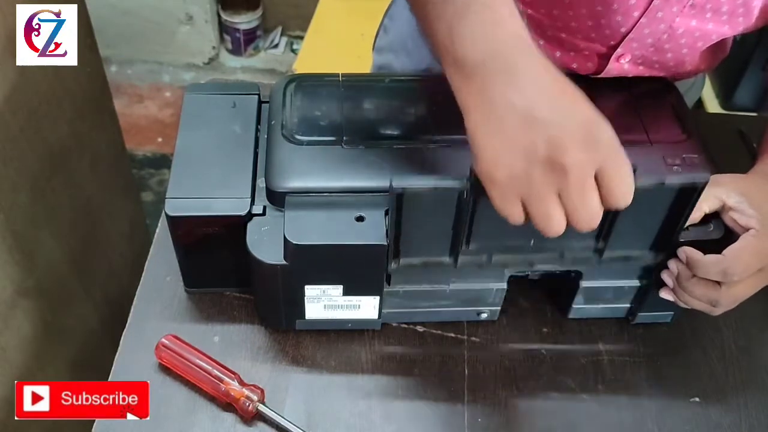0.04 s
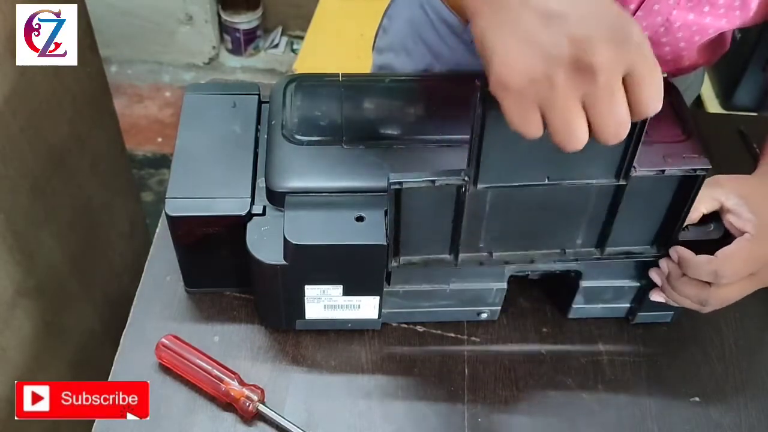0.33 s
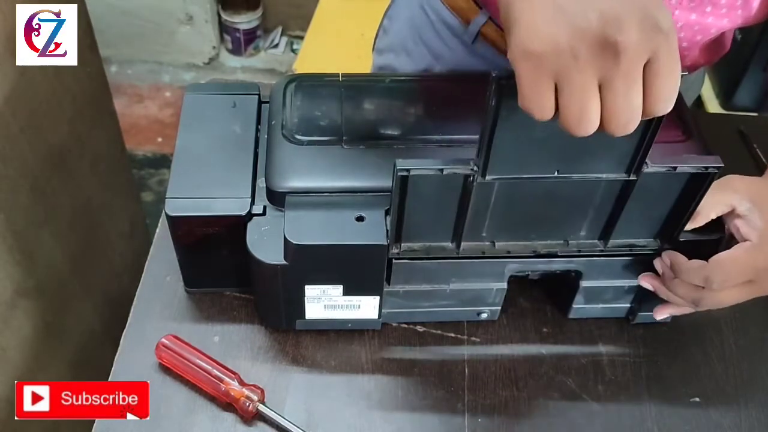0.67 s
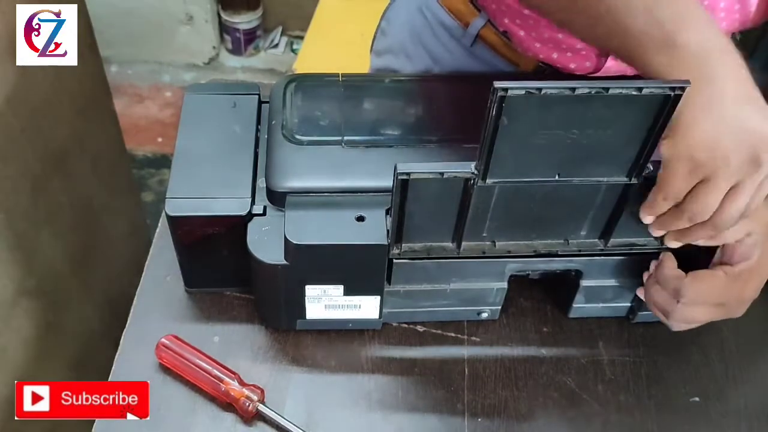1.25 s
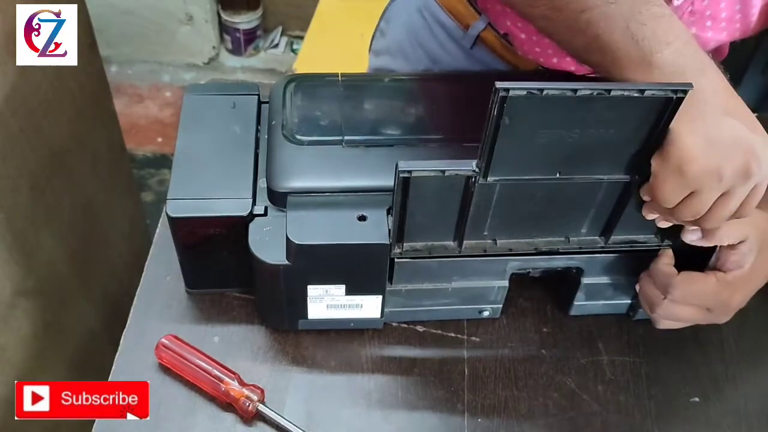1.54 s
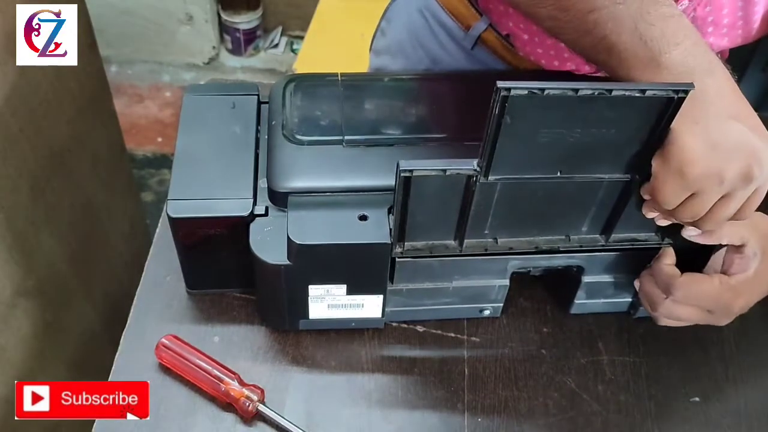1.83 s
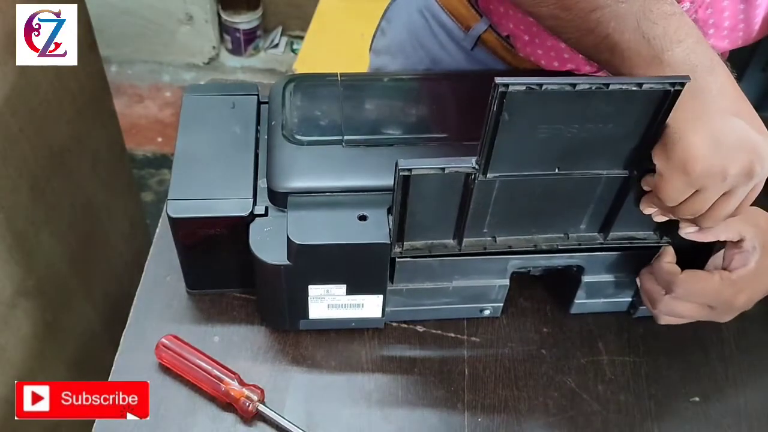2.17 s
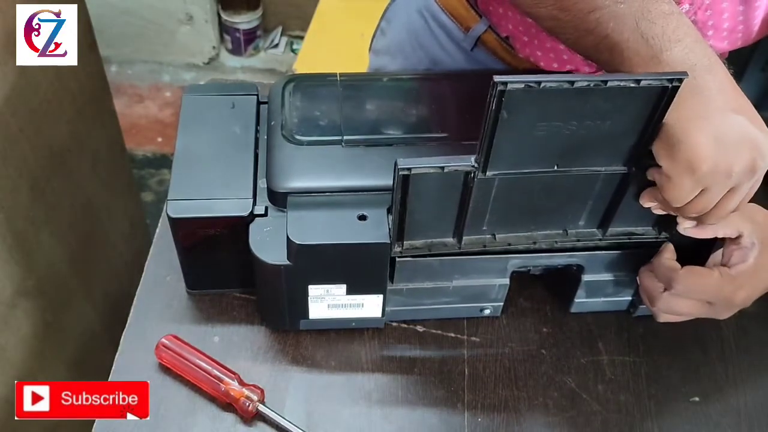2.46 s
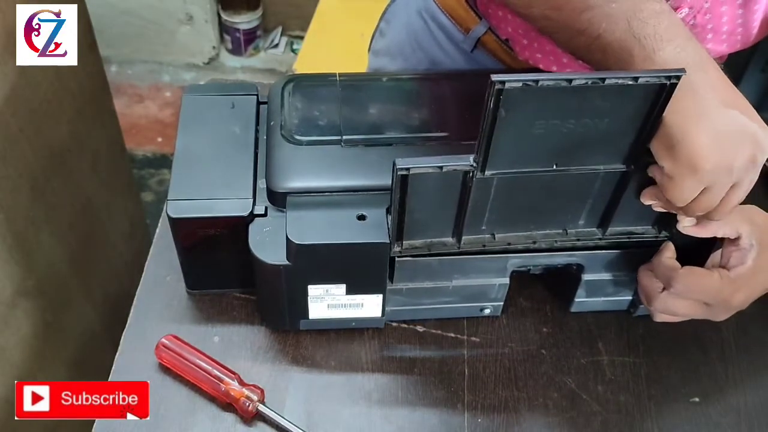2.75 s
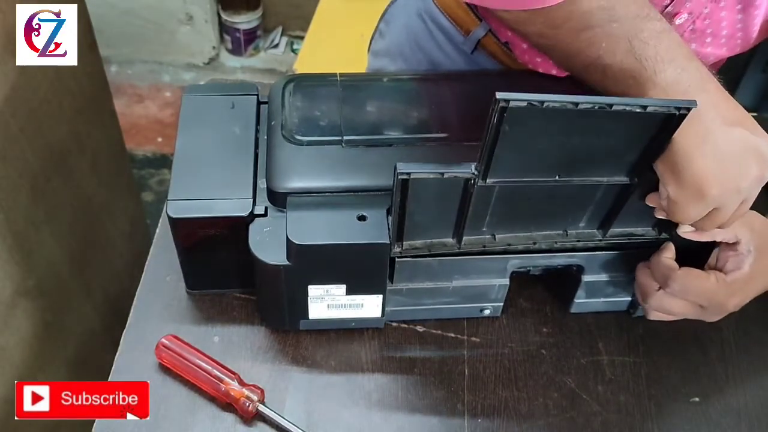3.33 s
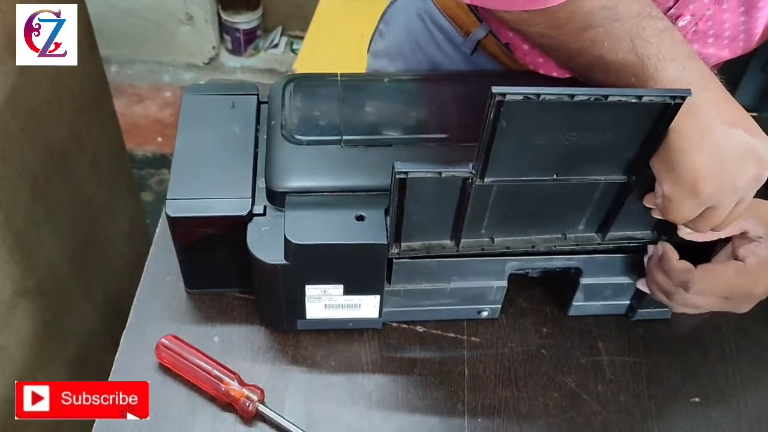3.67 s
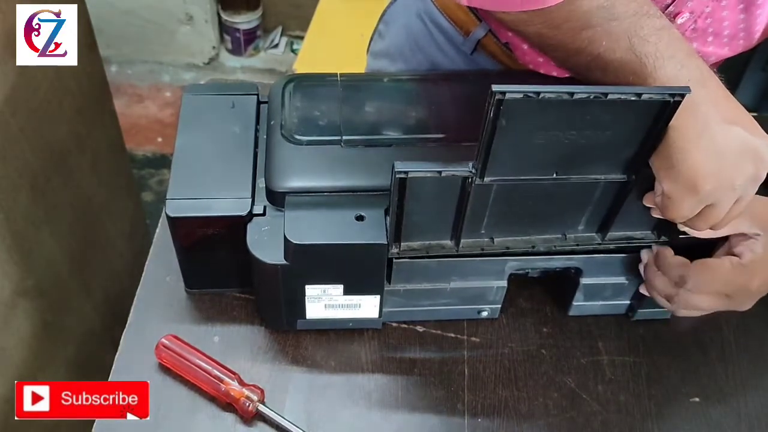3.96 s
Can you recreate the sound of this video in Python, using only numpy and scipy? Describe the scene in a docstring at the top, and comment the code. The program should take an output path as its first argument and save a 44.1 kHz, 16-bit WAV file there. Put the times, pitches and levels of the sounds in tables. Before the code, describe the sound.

A printer's plastic paper tray slides out with three hollow clacks. Fingers then scuff, knock and snap at the casing, rubbing harder near the end with a faint squeak. Heard close in a small room with a faint hum.

```python
"""A printer's plastic paper tray slides out in a small room, over soft air noise and a faint hum.
It clacks against its stops three times, ringing the hollow shell; faint bass bursts underlie the clacks,
and the last leaves a thin metal ring. Fingers then scuff, knock and snap a corner of the casing.
Rubbing, heard throughout, grows near the end, where strained plastic squeaks. A close phone picks it up."""
import sys
import numpy as np
from scipy import signal
from scipy.fft import rfft, irfft
from scipy.io import wavfile
from scipy.ndimage import map_coordinates

SR = 44100
rng = np.random.default_rng(int(sys.argv[2]) if len(sys.argv) > 2 else 0)


def to_wav(s):
    """Save 16-bit WAV."""
    ch = np.atleast_2d(s).T  # columns
    pcm = np.round(np.clip(ch, -1, 1) * 32767)  # PCM
    wavfile.write(sys.argv[1], SR, pcm.astype(np.int16))


N = 176400

# contact registers: body, low mids, high mids, treble
# (from [Hz], to [Hz], attack [s], base t60 [s], base room tail [dB], L/R likeness [0-1], L-R [dB])
REGISTERS = [(291, 558, 0.0088, 0.11, -20.5, 0.86, 0.5), (600, 1140, 0.00022, 0.11, -2.5, 0.79, 0),
             (1162, 3370, 0.00081, 0.095, -2.5, 0.52, -1.5), (3430, 23500, 0.000097, 0.061, 2, 0.11, -1.5)]
# broad response of the plastic (frequency [Hz], gain [dB])
PLASTIC_COLOUR = [(250, 0), (320, 1), (600, 2.5), (1250, -6), (2200, -8.5), (2650, -13), (3300, -16),
                  (5400, -24), (6150, -21), (6500, -12), (7100, -12), (7800, -18), (10000, -25),
                  (13500, -27.5), (15000, -22.5)]
# room air spectrum (frequency [Hz], gain [dB])
AIR_COLOUR = [(250, -2.5), (350, 4.5), (550, 9.5), (900, -3.5), (1500, -15), (3000, -16.5), (5200, -25),
              (6100, -20.5), (6900, -29.5), (8200, -19.5), (13000, -53), (15200, -24.5)]
# tray sliding in its guides (time [s], level [dB])
SLIDE_LEVELS = [(0, -40.5), (.04, -45), (.09, -55.5), (.15, -45.5), (.17, -41.5), (.24, -48.5), (.28, -53),
                (.38, -49.5), (.425, -78), (.46, -45.5), (.52, -53), (.6, -84)]
# slide spectrum (frequency [Hz], gain [dB])
SLIDE_COLOUR = [(250, 2.5), (600, -2.5), (1200, -4.5), (2500, 1), (7000, 3.5), (15000, 5)]
# tray resonances (frequency [Hz], t60 [s], gain [dB])
TRAY_MODES = [(358, 0.19, -1), (511, 0.13, 2.5), (589, 0.057, 1), (668, 0.052, -6), (791, .25, 3.5),
              (1156, 0.1, -5), (1225, 0.045, 4.5), (1550, 0.077, -4), (3000, 0.067, 3), (6700, 0.24, -8)]
# fingers rubbing the casing (time [s], level [dB])
RUB_LEVELS = [(.55, -55.5), (.88, -62.5), (1.06, -66), (1.25, -60), (1.53, -58.5), (1.68, -61), (1.89, -64),
              (2.14, -56.5), (2.24, -56), (2.46, -54), (2.62, -62), (2.83, -61.5), (2.94, -57), (3.12, -59),
              (3.22, -54.5), (3.5, -54), (3.63, -48.5), (3.9, -49), (3.96, -49.5), (4, -50)]
# rub spectrum (frequency [Hz], gain [dB])
RUB_COLOUR = [(250, 5), (450, 3.5), (900, 0.5), (1400, 0), (2500, 2.5), (3400, 1.5), (6800, -0.5),
              (15000, -3)]
# casing corner resonances (frequency [Hz], t60 [s], gain [dB])
CORNER_MODES = [(340.6, 0.036, -2), (415, 0.24, 5), (2005, 0.11, 0), (2150, 0.13, -4.5), (3004, 0.14, 3)]
# tray hitting its stops (time [s], body [dB], low mids [dB], high mids [dB], treble [dB])
TRAY_HITS = [(.029, -49, -52, -70, -59), (.1728, -40.5, -34.5, -31.5, -33), (.2932, -77, -46.5, -43.5, -49),
             (.334, -48, -35.5, -39, -38), (.339, -41.5, -43, -43, -68), (.441, -46.5, -48.5, -51.5, -56),
             (.4715, -37, -38, -44.5, -48), (.485, -38, -39, -48.5, -52.5), (.495, -39.5, -46, -47.5, -73),
             (.516, -50.5, -47, -53.5, -60)]
# brief bass bursts under some sharp hits (time [s], level before filtering [dB])
BASS_BURSTS = [(0.171, -31), (.333, -27.5), (0.47, -32), (1.597, -30.5), (2.296, -39)]
# fingertip scuffs (time [s], rise [s], level [dB])
SCUFFS = [(0.644, 0.0076, -50.5), (0.713, 0.0037, -54), (0.777, 0.0066, -53), (.931, .009, -57),
          (1.146, .016, -59.5), (1.219, 0.0034, -55.5), (1.45, 0.013, -53.5), (1.542, 0.012, -57),
          (2.45, 0.0064, -54.5), (2.985, 0.0039, -56)]
# finger knocks and snaps (time [s], body [dB], low mids [dB], high mids [dB], treble [dB])
FINGER_HITS = [(.761, -55, -50.5, -75, -73), (.9205, -49.5, -51, -60, -65), (1.0945, -61, -59, -58.5, -79),
               (1.304, -52, -56, -61, -66), (1.372, -84, -58.5, -58.5, -69),
               (1.597, -52, -52.5, -51.5, -54.5), (1.6575, -60, -48.5, -50.5, -53),
               (1.7134, -55, -51.5, -53.5, -57), (1.9362, -60.5, -60, -61.5, -58),
               (2.061, -60, -63, -66, -60.5), (2.122, -86, -61.5, -62.5, -61.5),
               (2.194, -57, -54, -52, -59), (2.229, -63, -62.5, -55.5, -58.5),
               (2.287, -56.5, -60, -60, -61.5), (2.297, -67, -59, -82, -54.5),
               (2.339, -67, -58.5, -69, -57), (2.405, -64, -55, -48, -56), (2.669, -58, -61, -68, -65.5),
               (3.1576, -53.5, -52.5, -61, -65), (3.271, -82, -58, -58.5, -64),
               (3.371, -72, -56.5, -58.5, -62.5), (3.597, -56.5, -53.5, -52.5, -63),
               (3.609, -50, -48, -47.5, -54), (3.657, -48.5, -57, -51.5, -67), (3.728, -72, -64, -55, -78),
               (3.934, -80, -51, -55, -59), (3.958, -83, -51.5, -47.5, -57)]
# a slow corner ring under the rubbing, then a plastic slip (peak time [s], Gaussian sigma [s], frequency [Hz],
# bandwidth [Hz], level [dB])
SQUEAKS = [(3.83, .15, 3055, 110, -67), (3.941, .014, 6600, 350, -58)]

TIME_S = np.arange(N) / SR


def undb(db):
    """Decibels to gain."""
    return 10 ** (np.asarray(db) / 20)


def unit(x):
    """Scale to rms 1."""
    return x / np.sqrt(np.mean(x ** 2) + 1e-30)


def decay(age_s, t60_s):
    """Exponential fade, 60 dB in t60_s."""
    return np.exp(-np.log(1000) * age_s / t60_s)


def curve(points):
    """Gain from (time [s], level [dB]); end values hold."""
    time_s, db = np.array(points).T
    return undb(np.interp(TIME_S, time_s, db))


def swell(start_s, rise_s):
    """Stroke envelope: peak after rise_s, slower fall."""
    age = np.maximum(TIME_S - start_s, 0) / rise_s
    return np.sqrt(age * np.exp(1 - age))


def colour(x, points, size=2048):
    """Minimum-phase filter from (frequency [Hz], gain [dB])."""
    hz, db = np.array(points).T
    bins_hz = np.arange(size // 2 + 1) * SR / size
    gain = undb(np.interp(np.log(bins_hz + 1), np.log(hz), db))
    cepstrum = irfft(np.log(gain))
    cepstrum[1:size // 2] *= 2
    cepstrum[size // 2 + 1:] = 0
    impulse = irfft(np.exp(rfft(cepstrum)))
    return signal.fftconvolve(x, impulse[None], axes=1)[:, :x.shape[1]]


def band(x, edges_hz, kind, order):
    """Butterworth filter."""
    return signal.sosfilt(signal.butter(order, edges_hz, kind, fs=SR, output="sos"), x)


def noise_pair(n, likeness):
    """Left and right noise, correlated by likeness."""
    mid, side = rng.standard_normal((2, n))
    return np.sqrt(1 + likeness) * mid + np.sqrt(1 - likeness) * np.array([side, -side])


def wide_noise(split_hz=1500):
    """Stereo noise, wider in the treble."""
    lows = band(noise_pair(N, likeness=0.56), split_hz, "low", order=2)
    highs = band(noise_pair(N, likeness=0.14), split_hz, "high", order=2)
    return lows + highs


def shell(x, modes):
    """Plastic part: ringing modes under a broad colour."""
    out = x.copy()
    for hz, t60_s, db in modes:
        width_hz = np.log(1000) / (np.pi * t60_s)
        resonator = signal.iirpeak(hz, hz / width_hz, fs=SR)
        out += undb(db) * signal.lfilter(*resonator, x + 1e-18)
    return colour(out, PLASTIC_COLOUR)


def friction(modes, catches_per_s, spread_db, catch_s):
    """Stick-slip: tiny random catches over steady hiss, through the shell."""
    caught = rng.random(N) < catches_per_s / SR
    size = np.minimum(rng.exponential(size=N), 3)
    catches = caught * undb(spread_db * size) ** 2
    energy = signal.lfilter([1], [1, -np.exp(-1 / (catch_s * SR))], catches)
    return shell(wide_noise() * np.sqrt(energy / energy.mean() + 1), modes)


def contacts(hits, modes, t60_scale, crack_db, room_offset_db):
    """Each hit cracks and rings dense shell modes, briefest in the treble; the room answers."""
    crack_s, crack_corner_hz = 0.0023, 1730
    room_rise_s, room_t60_s = 0.0034, 0.22
    n, level_window = SR // 3, int(0.024 * SR)
    age_s = np.arange(n) / SR
    room_envelope = (1 - np.exp(-age_s / room_rise_s)) * decay(age_s, room_t60_s)
    out = np.zeros((2, N + n))
    for start_s, *levels_db in hits:
        start = int(start_s * SR)
        for db, register in zip(levels_db, REGISTERS):
            low_hz, high_hz, attack_s, t60_s, tail_db, likeness, pan_db = register
            crack = undb(crack_db) * min(low_hz / crack_corner_hz, 1) ** 2 * np.exp(-age_s / crack_s)
            envelope = (1 - np.exp(-age_s / attack_s)) * (decay(age_s, t60_s * t60_scale) + crack)
            direct = noise_pair(n, likeness) * envelope
            room = noise_pair(n, likeness / 2) * undb(tail_db + room_offset_db) * room_envelope
            hit = shell(direct + room, modes)
            hit = band(hit, [low_hz, min(high_hz, SR / 2 - 1)], "band", order=3)
            hit *= undb([[pan_db / 2], [-pan_db / 2]])
            onset_rms = np.sqrt(np.mean(hit[:, :level_window] ** 2))
            out[:, start:start + n] += hit * undb(db) / onset_rms
    return out[:, :N]


def room_tone(air_db=-69.5, hum_hz=507, hum_db=-68, waver_hz=2.4):
    """Soft air noise and a faint hum of wavering phase."""
    waver_rad = 1.53 * unit(band(rng.standard_normal(N), waver_hz, "low", order=2))
    hum = np.sqrt(2) * np.sin(2 * np.pi * hum_hz * TIME_S + waver_rad)
    air = unit(colour(wide_noise(), AIR_COLOUR))
    return air * undb(air_db) + hum * undb(hum_db)


def tray_slide():
    """The tray catches and slips in its guides."""
    scrape = friction(TRAY_MODES, catches_per_s=400, spread_db=4.5, catch_s=0.0036)
    sliding = TIME_S < SLIDE_LEVELS[-1][0]
    return unit(colour(scrape, SLIDE_COLOUR)) * curve(SLIDE_LEVELS) * sliding


def finger_rub():
    """Skin friction drives the corner's modes."""
    rub = friction(CORNER_MODES, catches_per_s=160, spread_db=2.0, catch_s=0.004)
    return unit(colour(rub, RUB_COLOUR)) * curve(RUB_LEVELS)


def tray_clacks():
    """The tray strikes its stops and rings."""
    return contacts(TRAY_HITS, TRAY_MODES, t60_scale=0.89, crack_db=-4.5, room_offset_db=-8)


def bass_bursts(cutoff_hz=162, t60_s=0.15):
    """Brief low noise under some sharp hits; it leaks faintly through the bass cut."""
    envelope = sum(undb(db) * (TIME_S >= start_s) * decay(np.abs(TIME_S - start_s), t60_s)
                   for start_s, db in BASS_BURSTS)
    rumble = unit(band(wide_noise(), cutoff_hz, "low", order=1))
    return band(rumble * envelope, cutoff_hz, "low", order=10)


def metal_ring(start_s=0.475, partials_hz=(3494, 3524, 4026), partial_db=-77.5, t60_s=2.4):
    """A small metal part rings after the last clack; close partials beat."""
    age_s = np.maximum(TIME_S - start_s, 0)
    partials = sum(np.sin(2 * np.pi * hz * age_s) for hz in partials_hz)
    return undb(partial_db) * partials * decay(age_s, t60_s)


def skin_scuffs(scuff_band_hz=(340, 1160), brush_from_hz=6000, brush_db=-74):
    """Skin drags over plastic: dull scuffs, one airy brush along the tray's edge."""
    hiss = colour(wide_noise(), PLASTIC_COLOUR)
    dull = unit(band(hiss, scuff_band_hz, "band", order=3))
    airy = unit(band(hiss, brush_from_hz, "high", order=2))
    strokes = sum(undb(db) * swell(start_s, rise_s) for start_s, rise_s, db in SCUFFS)
    return dull * strokes + airy * undb(brush_db) * swell(start_s=1.262, rise_s=0.04)


def finger_knocks():
    """Fingers knock and snap the corner: sharp crack, short ring."""
    return contacts(FINGER_HITS, CORNER_MODES, t60_scale=0.64, crack_db=7, room_offset_db=-0.5)


def squeaks():
    """Narrow high tones: the rubbed corner rings faintly near 3 kHz, then plastic slips with a brief squeak."""
    out = np.zeros((2, N))
    for peak_s, sigma_s, hz, width_hz, db in SQUEAKS:
        slip = np.exp(-0.5 * ((TIME_S - peak_s) / sigma_s) ** 2)
        resonance = band(wide_noise(), [hz - width_hz / 2, hz + width_hz / 2], "band", order=2)
        out += unit(resonance) * slip * undb(db)
    return out


def scene(right_lag_s=0.00008, left_louder_db=1):
    """All sources; the left microphone gets them slightly earlier and louder."""
    left, right = (room_tone() + tray_slide() + finger_rub() + tray_clacks() + bass_bursts()
                   + metal_ring() + skin_scuffs() + finger_knocks() + squeaks())
    right = map_coordinates(right, [np.arange(N) - right_lag_s * SR], mode="nearest")
    return np.array([left * undb(left_louder_db / 2), right * undb(-left_louder_db / 2)])


def record(dry, low_cut_hz=275, bass_leak_db=-37.5, top_hz=15450):
    """Phone: steep bass cut with a slight leak, steep top cut."""
    passed = band(dry, low_cut_hz, "high", order=16)
    leak = undb(bass_leak_db) * band(dry, low_cut_hz, "low", order=2)
    top_cut = signal.ellip(10, 0.2, 80, top_hz, fs=SR, output="sos")
    return signal.sosfilt(top_cut, passed + leak)


dry = scene()
out = record(dry)
to_wav(out)
```